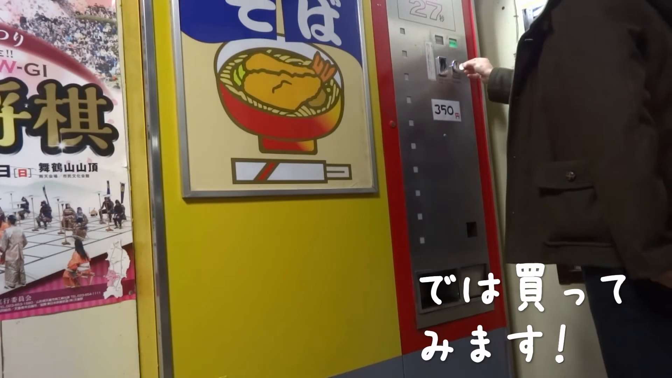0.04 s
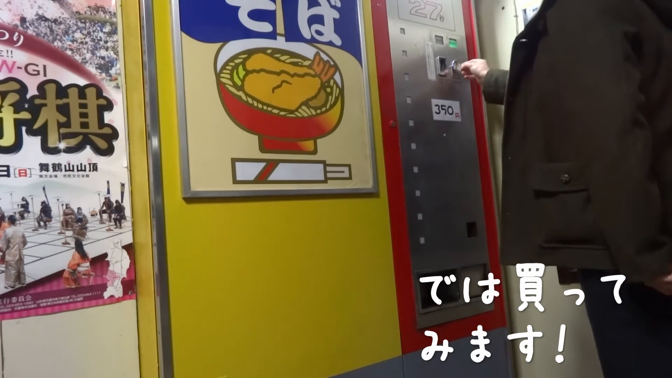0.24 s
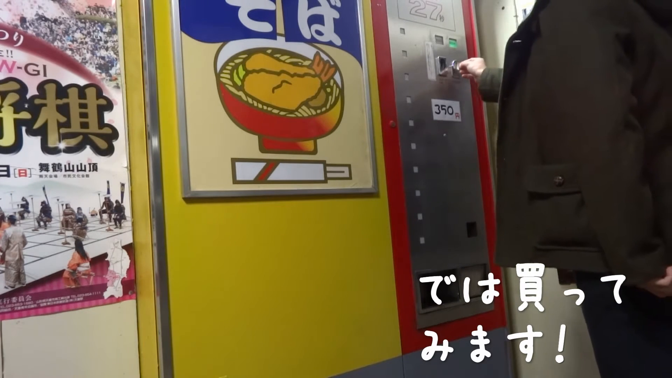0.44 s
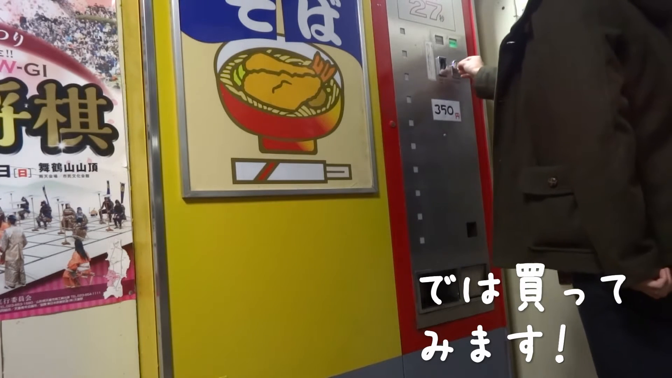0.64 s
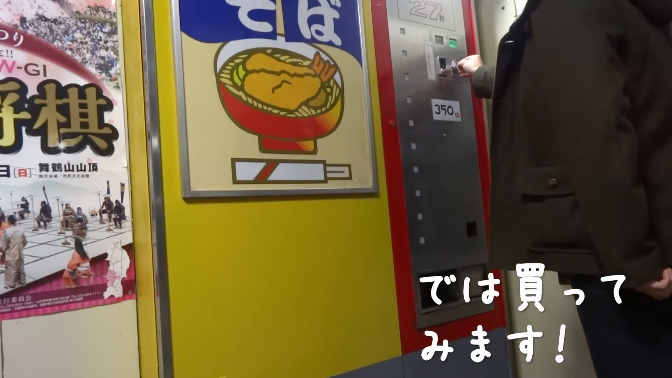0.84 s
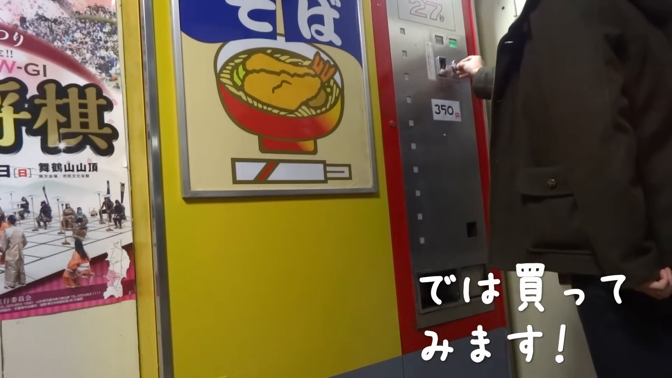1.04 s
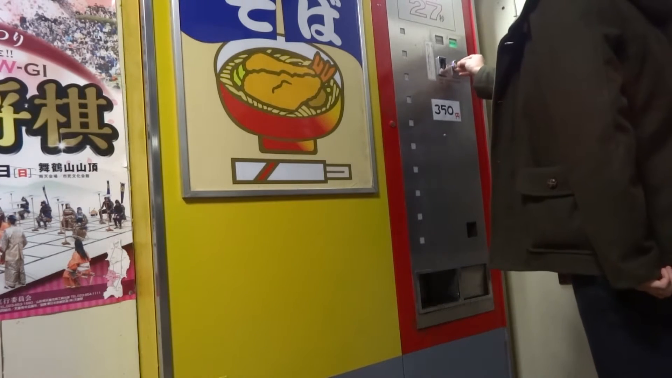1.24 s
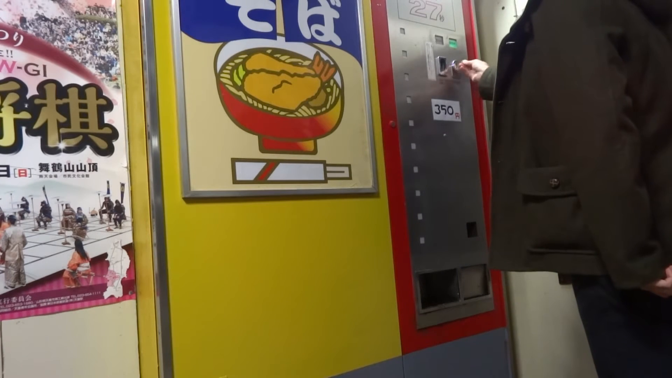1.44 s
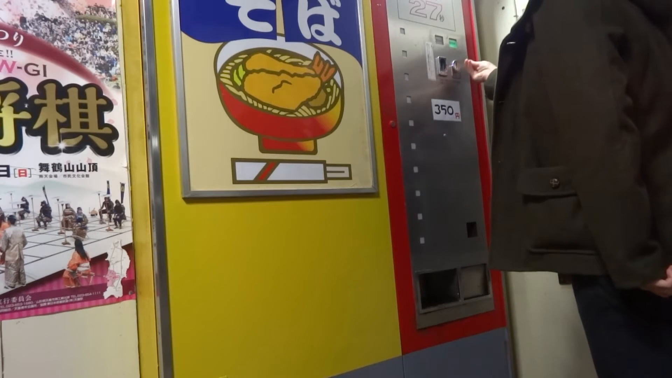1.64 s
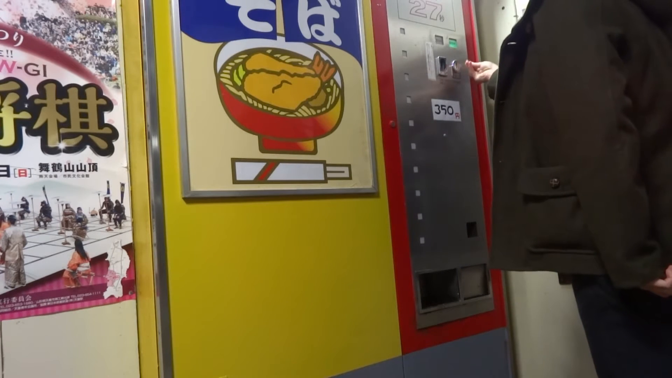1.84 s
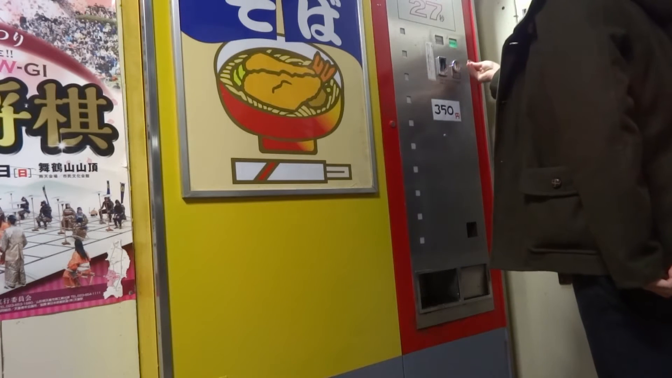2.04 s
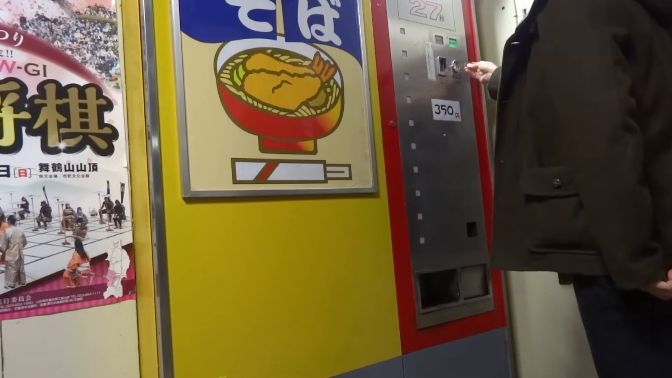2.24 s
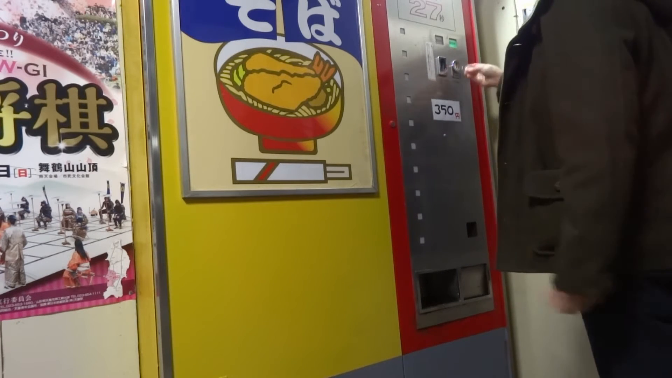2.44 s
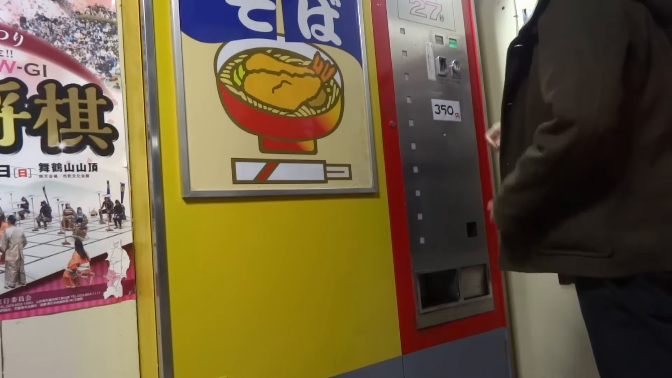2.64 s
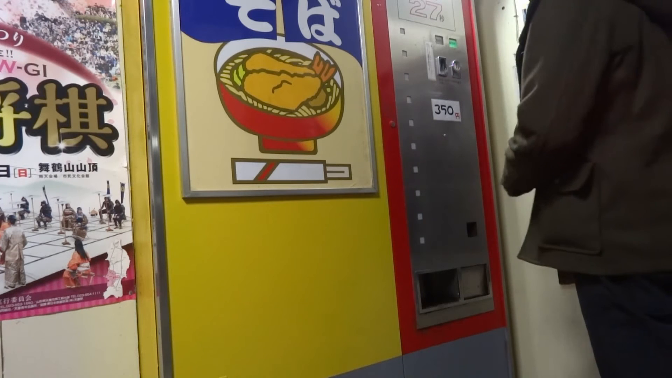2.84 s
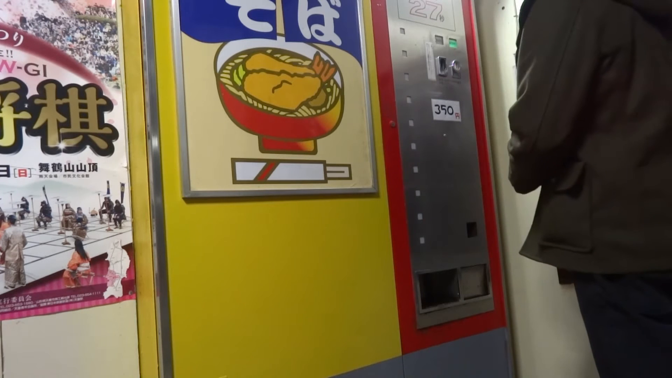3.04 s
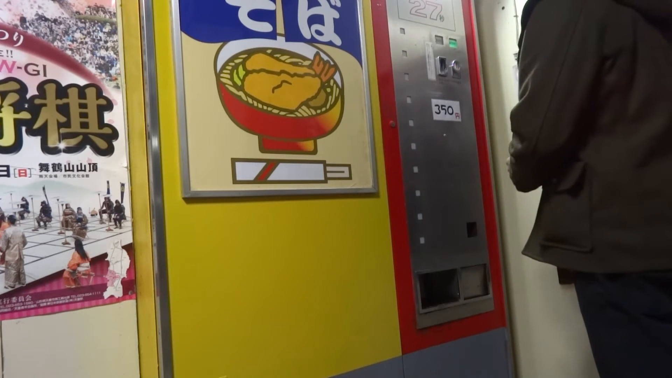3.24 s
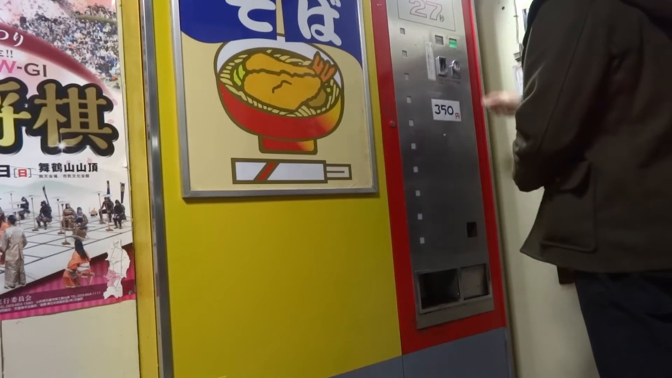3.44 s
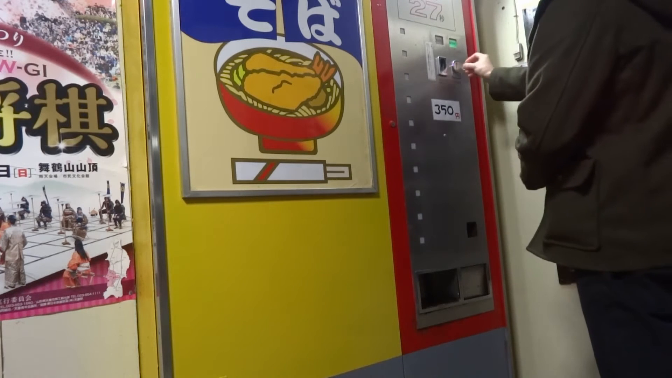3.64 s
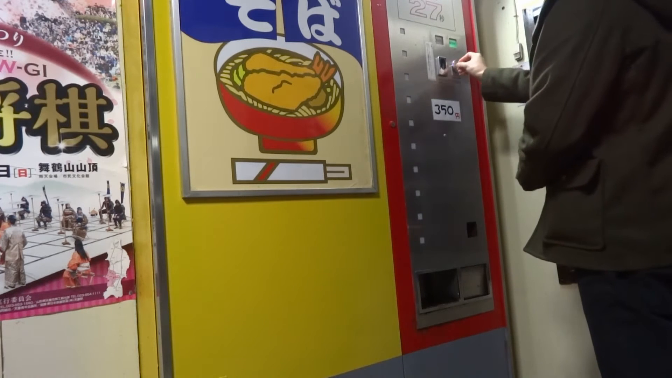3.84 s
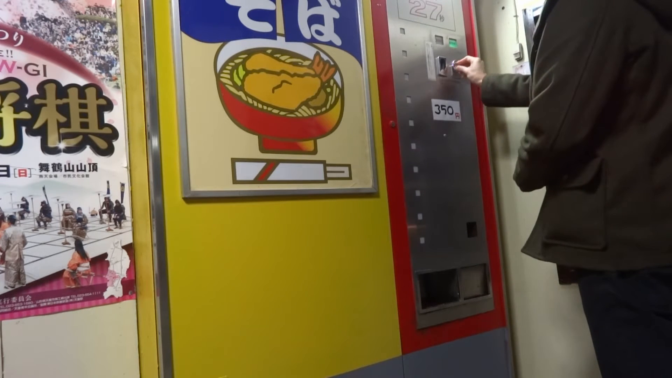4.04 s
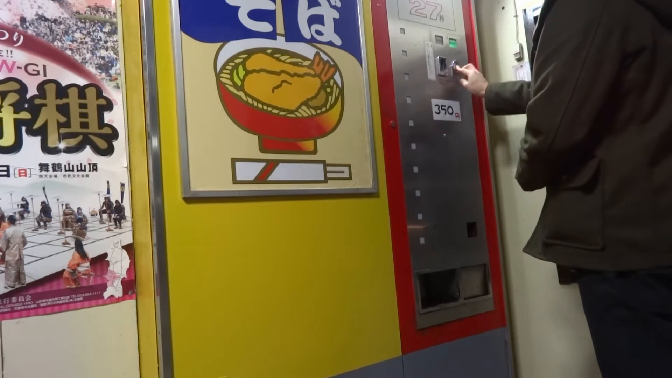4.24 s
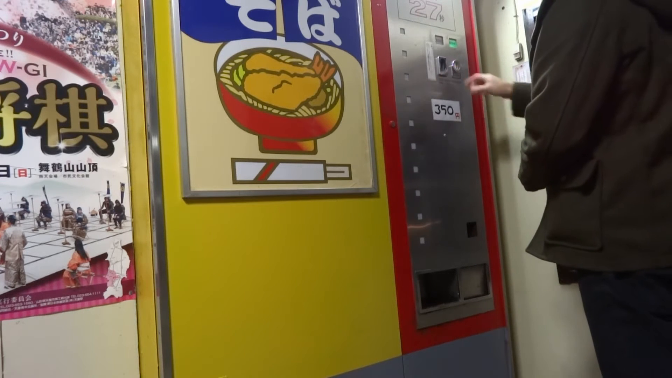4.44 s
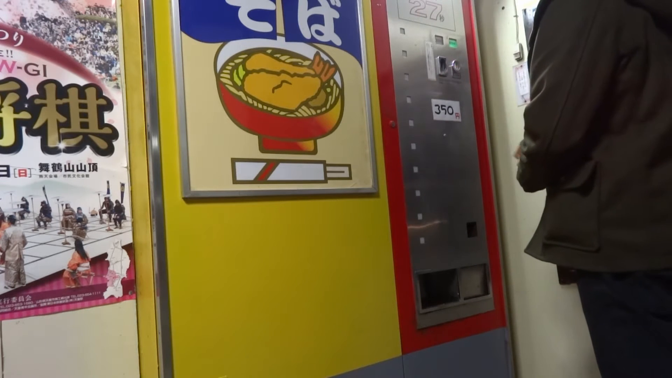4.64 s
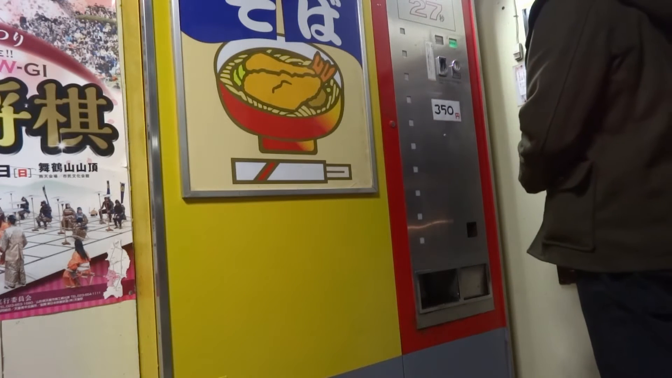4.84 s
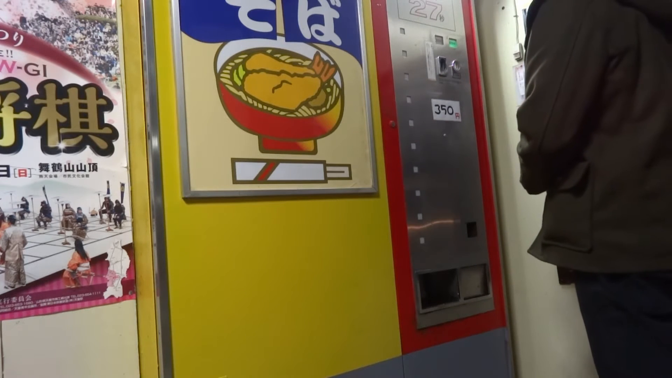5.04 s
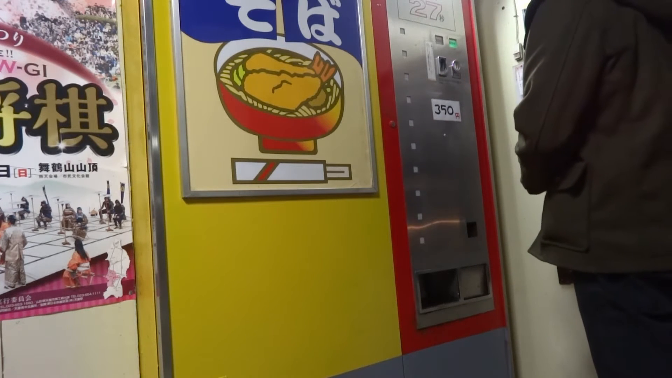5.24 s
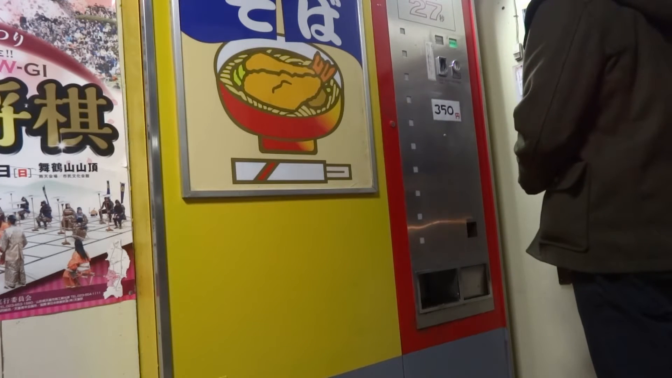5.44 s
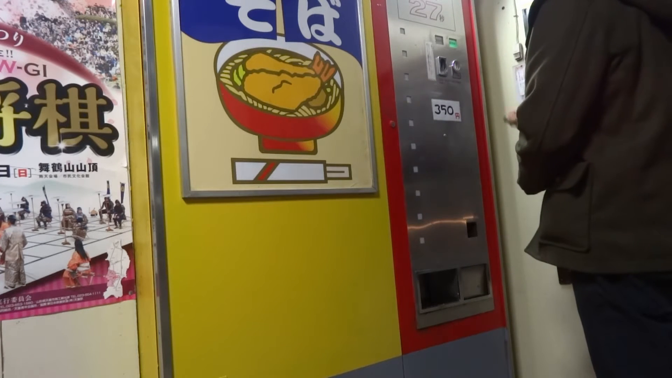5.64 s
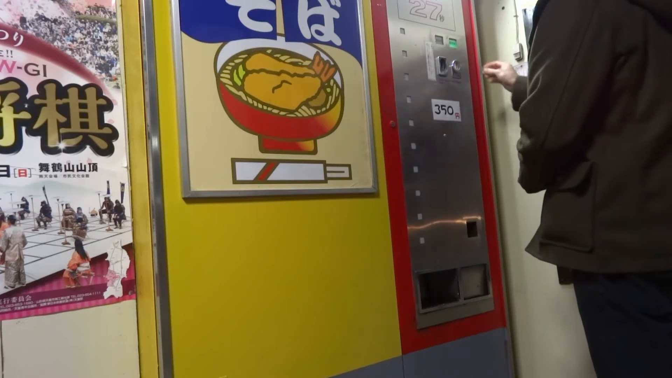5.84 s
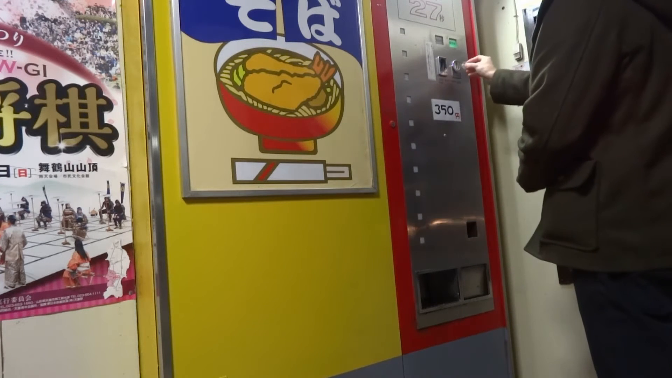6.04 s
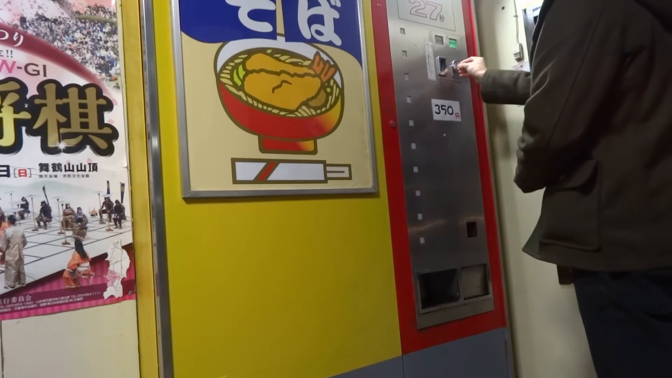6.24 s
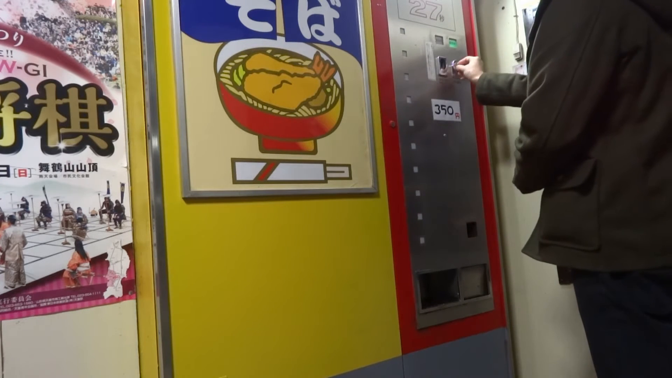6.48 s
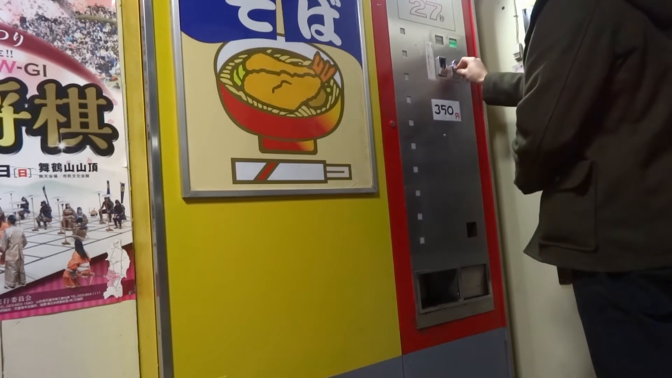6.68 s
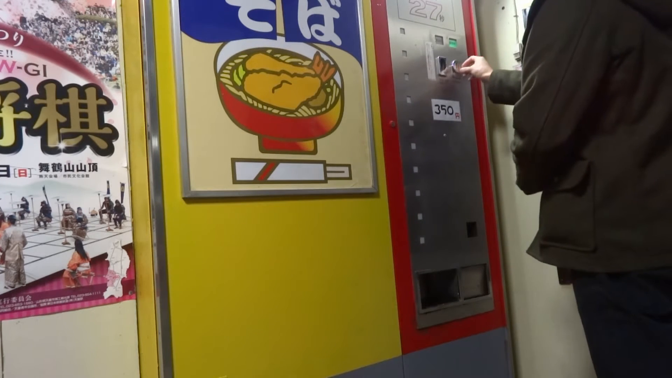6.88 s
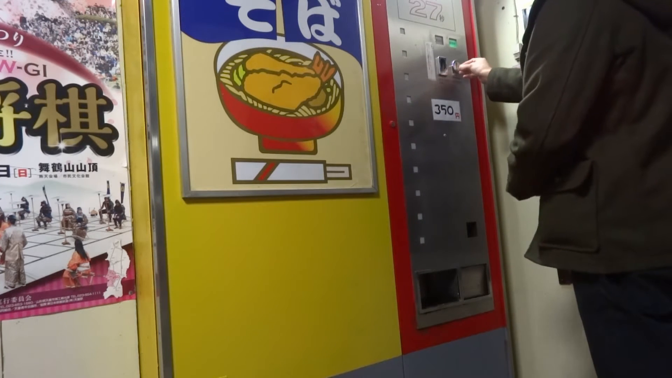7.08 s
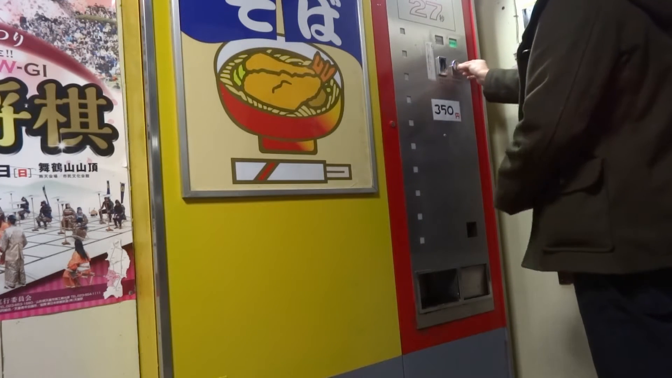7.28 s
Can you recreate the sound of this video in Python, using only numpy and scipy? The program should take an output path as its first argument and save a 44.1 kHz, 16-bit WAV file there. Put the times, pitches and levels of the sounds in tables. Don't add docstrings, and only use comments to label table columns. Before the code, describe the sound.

Three coins pushed one by one into a steel vending machine, each clicking, clanging down a metal chute and clattering away inside a hard-walled room.

```python
import sys
import numpy as np
from scipy import signal
from scipy.fft import rfft
from scipy.io import wavfile
from scipy.ndimage import uniform_filter1d

SR = 44100
rng = np.random.default_rng(int(sys.argv[2]) if len(sys.argv) > 2 else 0)


def output_pcm(signal):
    pcm = np.clip(np.atleast_2d(signal).T, -1, 1) * 32767
    wavfile.write(sys.argv[1], SR, np.round(pcm).astype(np.int16))


def level_to_linear(level):
    exponent = np.asarray(level, float) / 20
    return 10 ** exponent


N = 322371

# start in seconds, peak in dB,
# tilt in dB per octave, favoured pitch in Hz, level of the box crack in dB.
CHUTE_HITS = [
    [(1.348, -8.5, -1, 1370, -4), (1.3798, -11, 0.5, 3540, 0.5), (1.3914, -12.5, -5.5, 2690, 1.5),
     (1.4294, -11, -1, 1340, 1.5), (1.4374, -11.5, 5, 2500, -13), (1.4494, -18, -1, 1600, -2)],
    [(4.339, -8, 2.5, 3360, -1), (4.3819, -10.5, -5.5, 1735, -1), (4.3994, -11, 0.4, 2400, 0.5),
     (4.4244, -22.5, -3, 1700, 9)],
    [(6.824, -11.5, -1.3, 1360, 2), (6.8494, -20, -1.5, 1340, 9.5), (6.872, -10.5, 3, 4300, -4.5),
     (6.8894, -13.5, 1, 2590, 2), (6.9044, -13.5, 0, 2610, 2)],
]
# start in seconds, peak in dB,
# tilt in dB per octave, favoured pitch in Hz, level of the box crack in dB.
FLAP_HITS = [
    [(1.249, -18, 2.5, 2560, -8.5), (1.2644, -21.5, -2, 2285, -8), (1.2994, -29, -3, 2527, 2),
     (1.3194, -23, -1, 1653, -0.5)],
    [(4.245, -16.5, 0.2, 2530, -4), (4.28, -23, 1, 2520, -6)],
    [(6.733, -18.5, 1, 2830, -6.5), (6.76, -24.5, 1, 3830, -1)],
]
# pitch in Hz, width in Hz, level in dB.
BOX = [(1522, 510, 0), (2590, 410, 3.5), (3652, 206, 1), (4230, 750, 2.5), (6410, 1850, -3),
       (8050, 1740, -8.5)]
# pitch in Hz, level in dB.
FLAP_MODES = [(920.5, -44), (1346, -53), (1653, -50), (2285, -43), (2527, -40.5), (2830, -56), (3830, -46),
              (4102, -57), (6363, -55), (8300, -49), (8690, -45.5), (10450, -59)]
# pitch in Hz, level in dB.
SHEET_MODES = [(1308, -43), (1343, -35.5), (1580, -74), (1723, -33), (2869, -73), (3537, -32), (4095, -38),
               (5085, -37), (5810, -54), (7208, -45), (8258, -60), (8952, -59), (9500, -56), (10480, -52)]
# pitch in Hz, level in dB.
FIRST_COIN_MODES = [(1038, -37.5), (2342, -54), (2480, -32.5), (2690, -49), (4300, -45), (5730, -38),
                    (6460, -57), (6590, -41), (830, -41.5), (6702, -49), (6977, -56), (7504, -58),
                    (8597, -55)]
SECOND_COIN_MODES = [(1077, -36), (1630, -53), (2030, -36.5), (2401, -34.5), (2686, -67), (3860, -61),
                     (4576, -63), (6094, -60), (6853, -47), (8005, -49), (8619, -54)]
THIRD_COIN_MODES = [(829, -44), (1077, -44), (2213, -35.5), (2495, -35), (2584, -33), (4613, -43),
                    (4893, -35), (5265, -39), (5776, -40), (6245, -61), (6627, -44), (6756, -32),
                    (7526, -39.5)]
# pitch in Hz, time to fall 60 dB in seconds.
RING_T60 = [(800, .15), (2000, .1), (5000, .055), (9000, .055), (10500, .14)]

# start in seconds, peak in dB, strongest pitch in Hz,
# rattle length in seconds.
GATE = [
    (1.768, -38.5, 8440, 0.034),
    (1.7994, -37, 8540, 0.054),
    (1.8361, -27, 8700, 0.013),
    (1.8418, -31.5, 5230, 0.05),
    (1.864, -32, 2400, 0.013),
    (4.7396, -34.5, 2210, 0.031),
    (4.788, -23, 8800, 0.01),
    (4.8106, -30, 8700, 0.041),
    (7.2336, -36, 2460, 0.048),
    (7.2936, -25, 8050, 0.01),
]
RAIL = [
    (2.109, -39, 4630, 0.039),
    (2.1263, -24.5, 4270, 0.012),
    (2.17, -32.5, 3800, 0.027),
    (2.223, -34.5, 3830, 0.017),
    (2.275, -35, 3550, 0.033),
    (5.077, -42.5, 7300, 0.018),
    (5.1007, -25, 4200, 0.016),
    (5.158, -32.5, 3630, 0.034),
    (5.2334, -37, 2590, 0.054),
]
SORTER = [(2.3355, -33.5, 3570, 0.056), (2.4066, -26, 2920, 0.028), (2.4299, -17, 3820, 0.014),
          (2.455, -23, 3800, 0.026), (2.495, -35, 3900, 0.014), (2.526, -28, 4000, 0.015),
          (5.335, -30.5, 2400, 0.046), (5.375, -18, 2920, 0.0099), (5.389, -21, 2290, 0.013),
          (5.403, -18, 2170, 0.0095), (5.438, -27.5, 3970, 0.015), (5.4715, -30, 2900, 0.067)]
CASH_BOX = [
    (2.5493, -21, 4770, 0.03),
    (2.5706, -21.5, 4730, 0.018),
    (2.603, -34, 4840, 0.0077),
    (2.6326, -30.5, 4800, 0.018),
    (2.7, -48, 4800, 0.084),
    (5.548, -21, 4960, 0.012),
    (5.5646, -23, 2200, 0.026),
    (5.6065, -24.5, 3200, 0.014),
    (5.645, -28.5, 7730, 0.02),
    (5.6985, -33.5, 3020, 0.029),
]
# start in seconds, peak in dB, strongest pitch in Hz,
# rattle length in seconds.
SLIDES = [(3.402, -46.5, 6700, 0.027), (4.3, -31, 4600, 0.026), (3.1, -53, 8140, 0.024),
          (3.962, -28, 5800, 0.021), (4.004, -34, 5100, 0.032), (4.053, -40.5, 4700, 0.058),
          (4.203, -33, 7600, 0.042), (7.3, -38, 3000, 0.054), (6.402, -36, 4200, 0.012)]
COLOURS = {"gate": (-10.5, -22, 1, 5.2), "rail": (-4.5, -11, 9, 5), "sorter": (-11, -25, 10, 5),
           "cash box": (0, -8, 8.5, 19), "slide": (-4, -2, 1, 6)}
# start in seconds, peak in dB, strongest pitch in Hz, highs in dB.
TICKS = [(0.34, -29.5, 3530, 4.5), (0.517, -39, 8900, 8), (0.7322, -49, 7500, 19.5),
         (0.758, -30, 3600, -16), (0.9941, -40, 10400, 0), (1.025, -30, 9950, -13),
         (1.1104, -42.5, 9400, 13), (1.178, -34.5, 11000, 1), (1.213, -18.5, 10130, 6.5),
         (3.422, -26, 8360, -18), (3.812, -26, 3060, 12.5), (3.819, -27, 2750, 2),
         (3.834, -22.5, 3050, -22), (3.953, -20.5, 7330, 8), (4.213, -25, 6950, 5),
         (6.294, -28.5, 9000, 14), (6.312, -22.5, 9360, -11), (6.327, -25, 7340, -11),
         (0.483, -51, 4930, -10), (6.59, -38, 3070, -30), (6.607, -27.5, 7860, -28),
         (7.141, -30, 5280, -15)]
# start in seconds, end in seconds, first level in dB,
# last level in dB, first rail pitch in Hz.
ROLLS = [
    (2.171, 2.448, -45.5, -43, 1535),
    (5.15, 5.38, -46, -43, 1555),
    (5.639, 5.796, -38, -52.5, 1154),
]

# pitch in Hz, time to fall 60 dB in seconds.
ROOM_T60 = [(300, 1), (1000, 0.74), (2500, 0.57), (5000, 0.5), (10000, 0.46)]
# pitch in Hz, width in Hz, level in dB.
HUM = [(375.4, 19.6, -65), (574, 4, -66), (1067, 31, -68.5), (1340, 2.8, -85.5)]
# time in seconds, pitch in Hz, level in dB.
ENGINE = [
    (5.75, 358.3, -63.5),
    (6.2, 352, -51.5),
    (6.58, 358.3, -58),
    (6.74, 373.5, -61),
    (7.0, 354, -68),
]
# time in seconds, rumble in dB, tilt in dB per octave.
TRAFFIC = [
    (0.0, -56.5, -3.5),
    (1.2, -58.5, -1.3),
    (3.64, -56.5, -2.5),
    (5.0, -54, -1.5),
    (5.6, -48.5, -2),
    (6.03, -51, -1.66),
    (6.37, -46.5, -1.33),
    (7.31, -51, -2),
]
# pitch in Hz, density in dB per Hz.
RUMBLE = [(18, -70), (30, -43), (181, -17.5), (345, -5), (1000, -6.5), (2260, -8), (6500, -30),
          (11000, -120)]
HISS = [(1470, -43.5), (2500, -16), (3550, -7), (4150, -5), (9980, -8), (10600, -17), (13800, -47),
        (22000, -120)]


def rms_one(x):
    return x / np.sqrt(np.mean(x ** 2) + 1e-20)


def in_time(rows):
    s, *columns = np.transpose(rows)
    return [np.interp(np.arange(N) / SR, s, c) for c in columns]


def at_hz(points, hz):
    points_hz, values = np.transpose(points)
    return np.interp(np.log(hz), np.log(points_hz), values)


def band(x, low_hz, high_hz):
    return signal.sosfilt(signal.butter(2, [low_hz, high_hz], "band", fs=SR, output="sos"), x)


def high_pass(x, order, hz):
    return signal.sosfilt(signal.butter(order, hz, "high", fs=SR, output="sos"), x)


def resonance(x, hz, width_hz):
    r = np.exp(-np.pi * width_hz / SR)
    return signal.lfilter([(1 - r * r) / 2, 0, (r * r - 1) / 2], [1, -2 * r * np.cos(2 * np.pi * hz / SR), r * r], x)


def drift(rate_hz):
    knots = rng.standard_normal(400)
    return np.interp(np.arange(N) / SR * rate_hz, np.arange(400), knots)


def add(track, at_s, sound):
    i = round(at_s * SR)
    track[i:i + len(sound)] += sound[:N - i]


def spread(mid, side, side_db):
    return mid + level_to_linear(side_db) * side * [[1], [-1]]


def rattle(length_s, grain_db, rise_s):
    t = np.arange(4096) / SR
    grains = rng.standard_normal(4096) * level_to_linear(grain_db * np.minimum(rng.exponential(1, 4096), 3))
    swarm = grains * (1 - np.exp(-t / rise_s)) * np.exp(-t / np.clip(length_s, .001, .05))
    return swarm / np.sqrt(np.sum(swarm ** 2))


def skips(last_hit_s):
    gaps_s = .024 * 1.17 ** np.arange(6)
    times = last_hit_s + np.cumsum(gaps_s)
    first_db, loss_db, tilt_db, favoured_hz, crack_db = -25.5, 2.5, 0, 1780, 0
    return [(s, first_db - loss_db * k, tilt_db, favoured_hz, crack_db) for k, s in enumerate(times)]


def stages():
    coins = (FIRST_COIN_MODES, SECOND_COIN_MODES, THIRD_COIN_MODES)
    for flap_hits, chute_hits, coin_modes in zip(FLAP_HITS, CHUTE_HITS, coins):
        yield flap_hits, FLAP_MODES
        yield chute_hits + skips(chute_hits[-1][0]), SHEET_MODES + coin_modes


def tilt_at(tilt_db, hz):
    return np.clip(tilt_db, -4, 4) * np.log2(hz / 2500)


def box_crack(burst, tilt_db):
    crack = 0
    for hz, width_hz, db in BOX:
        ring = resonance(resonance(burst, hz, width_hz), hz, 2 * width_hz)
        crack = crack + level_to_linear(db + tilt_at(tilt_db, hz)) * ring
    return crack


def mode_ring(force, hz):
    r = level_to_linear(-60 / (at_hz(RING_T60, hz) * SR))
    out = 0
    for apart_hz, pair_db in ((0, 0), (rng.choice([-1, 1]) * rng.uniform(20, 45), -13)):
        w = 2 * np.pi * (hz + apart_hz) / SR
        out = out + level_to_linear(pair_db) * signal.lfilter([0, np.sin(w)], [1, -2 * r * np.cos(w), r * r], force)
    return out


def chute():
    out = np.zeros(N)
    for bounces, modes in stages():
        start = bounces[0][0]
        loudest_db = max(db for hz, db in modes)
        at = [round((row[0] - start) * SR) for row in bounces]
        bursts = [rattle(.016 if row[1] > -10 else .007, grain_db=4.0, rise_s=0.0042) for row in bounces]
        spectra = [np.maximum(abs(rfft(burst)), .4) for burst in bursts]
        part = np.zeros(SR // 2)
        for i, burst, (s, peak_db, tilt_db, favoured_hz, crack_db) in zip(at, bursts, bounces):
            part[i:i + 4096] += level_to_linear(peak_db + crack_db + 23.5) * box_crack(burst, tilt_db)
        for hz, level_db in modes:
            force = np.full(at[-1] + 6000, 1e-18)
            luck_db = rng.normal(0, 2.5, len(bounces))
            for i, burst, spectrum, own_db, row in zip(at, bursts, spectra, luck_db, bounces):
                s, peak_db, tilt_db, favoured_hz, crack_db = row
                near_db = 7 * np.exp(-(np.log2(hz / favoured_hz) / 0.095) ** 2)
                at_mode = spectrum[round(hz / SR * len(burst))]
                gain = level_to_linear(peak_db + own_db + near_db + tilt_at(tilt_db, hz))
                force[i:i + 4096] += gain * burst / at_mode
            part[:len(force)] += level_to_linear(level_db - loudest_db - 18.5) * mode_ring(force, hz)
        add(out, start, part)
    return high_pass(out, 4, 800)


def knocks(events, low_hz, split_hz, ring_db, sharpness, gain_db, rise_s):
    out = np.zeros(N)
    for s, peak_db, hz, lows_db, highs_db, length_s in events:
        burst = rattle(length_s, 3.5, rise_s) * np.sqrt(np.clip(length_s, .001, .05) * SR)
        lows = band(burst, low_hz, split_hz)
        mids = band(burst * rng.choice([-1, 1], len(burst)), split_hz, 7000)
        highs = band(burst, 7000, 13000)
        crack = level_to_linear(lows_db + 0.8) * lows + mids + level_to_linear(highs_db - 7) * highs
        ring = level_to_linear(ring_db) * resonance(burst, hz, hz / sharpness)
        add(out, s, level_to_linear(peak_db + gain_db) * (crack + ring))
    return out


def clatter():
    tables = {"gate": GATE, "rail": RAIL, "sorter": SORTER, "cash box": CASH_BOX, "slide": SLIDES}
    out = 0
    for name, rows in tables.items():
        lows_db, highs_db, ring_db, sharpness = COLOURS[name]
        events = [(s, db, hz, lows_db, highs_db, length_s) for s, db, hz, length_s in rows]
        out = out + knocks(events, 490, 1250, ring_db, sharpness, gain_db=-6.5, rise_s=0.0035)
    return out


def ticks():
    events = []
    for s, db, hz, highs_db in TICKS:
        lows_db = -6.5 - 21 * np.log2(hz / 4000)
        events.append((s, db, hz, lows_db, highs_db, 0.0051))
    return knocks(events, low_hz=1300, split_hz=3830, ring_db=13, sharpness=26.0, gain_db=-13.0, rise_s=0.00023)


def rolling():
    width_hz, sag_hz_per_s = 240, 500
    grains = rng.standard_normal((2, N)) * level_to_linear(2.0 * rng.exponential(1, N))
    shake = signal.sosfilt(signal.butter(2, width_hz, fs=SR, output="sos"), grains)
    out = np.zeros(N)
    for start, end, first_db, last_db, hz in ROLLS:
        t = np.arange(round((end - start) * SR)) / SR
        fade = np.clip(np.minimum(t, t[-1] - t) / 0.0022, 0, 1)
        phase = 2 * np.pi * (hz * t - sag_hz_per_s * t ** 2 / 2)
        cos_part, sin_part = shake[:, round(start * SR):][:, :len(t)]
        roll = rms_one(cos_part * np.cos(phase) + sin_part * np.sin(phase))
        add(out, start, fade * level_to_linear(np.linspace(first_db, last_db, len(t)) - 1.5) * roll)
    return out


def cabinet(coins):
    level_db, low_hz, high_hz, lag_s = -22, 205, 780, .06
    r = np.exp(-1 / (lag_s * SR))
    shaken = np.sqrt(signal.lfilter([1 - r], [1, -r], coins ** 2))
    panels = band(band(rng.standard_normal((2, N)), low_hz, high_hz), low_hz, high_hz)
    return level_to_linear(level_db) * shaken * rms_one(spread(*panels, side_db=-12))


def room(x):
    t = np.arange(SR) / SR
    edges = 200 * 2 ** np.arange(0, 6.1, .5)
    white = rng.standard_normal((2, SR))
    tail = 0
    for low, high in zip(edges, edges[1:]):
        t60 = at_hz(ROOM_T60, np.sqrt(low * high))
        tail = tail + band(white, low, high) * level_to_linear(-60 * t / t60)
    tail = tail * np.clip((t - .003) / 0.0067, 0, 1)
    tail = spread(*(tail / np.sqrt(np.sum(tail[0] ** 2))), side_db=-9)
    return signal.fftconvolve(x[None], tail, axes=1)[:, :N]


def compressor():
    white = rng.standard_normal(N)
    return sum(level_to_linear(db) * rms_one(resonance(resonance(white, hz, width), hz, width)) for hz, width, db in HUM)


def engine():
    hz, db = in_time(ENGINE)
    t = np.arange(N) / SR
    fade = np.clip(np.minimum(t - ENGINE[0][0], ENGINE[-1][0] - t) / 0.077, 0, 1)
    return fade * level_to_linear(db + 3.0 + 4.8 * drift(25.0)) * np.sin(2 * np.pi * np.cumsum(hz) / SR)


def banded_noise(spectrum, tilt_db, patchy_db):
    out = 0
    edges = 30 * 2 ** np.arange(0, 8.6, .5)
    white = rng.standard_normal((2, 2, N))
    for k, (low, high) in enumerate(zip(edges, edges[1:])):
        hz = np.sqrt(low * high)
        if spectrum[1][0] / 1.5 < hz < spectrum[-2][0] * 1.5:
            gain = level_to_linear(at_hz(spectrum, hz) + tilt_db * np.log2(hz / 400) + patchy_db * drift(9))
            out = out + gain * spread(*band(white[k % 2], low, high), side_db=-10)
    return rms_one(out)


def air():
    rumble_db, tilt_db = in_time(TRAFFIC)
    rumble = banded_noise(RUMBLE, tilt_db, patchy_db=1.3)
    hiss = banded_noise(HISS, 0, patchy_db=.8)
    return level_to_linear(rumble_db + 3.5) * rumble + level_to_linear(-65) * hiss


def scene():
    coins = high_pass(chute() + clatter() + ticks() + rolling(), 4, 600)
    machine = coins + level_to_linear(0.5) * room(coins) + cabinet(coins)
    left_db = -0.54
    return (machine + compressor() + engine() + air()) * level_to_linear(np.array([[left_db], [-left_db]]))


def low_pass(x):
    return signal.sosfilt(signal.butter(12, 11640, fs=SR, output="sos"), x)


def record(dry):
    bright_db = 10 * np.log10(uniform_filter1d(band(dry[0], 1800, 7200) ** 2, size=6000) + 1e-12)
    lows_db = 10 * np.log10(uniform_filter1d(band(dry[0], 200, 660) ** 2, size=15000) + 1e-12)
    bass = signal.sosfiltfilt(signal.butter(4, 190, "low", fs=SR, output="sos"), dry)
    duck_db = -1.7 * np.clip(bright_db - lows_db - 8.0, 0, 19)
    ducked = dry - bass * (1 - level_to_linear(duck_db))
    thin = high_pass(ducked, 2, 110)
    mix = signal.sosfilt(signal.ellip(12, .3, 80, 10560, fs=SR, output="sos"), thin)
    return low_pass(mix)


dry = scene()
out = record(dry)
output_pcm(out)
```